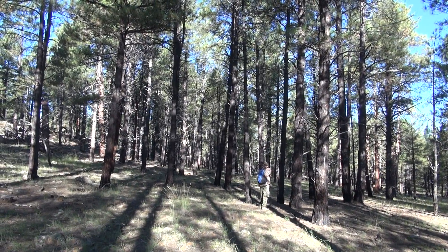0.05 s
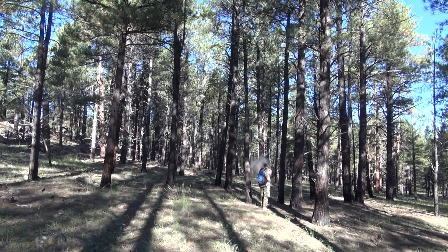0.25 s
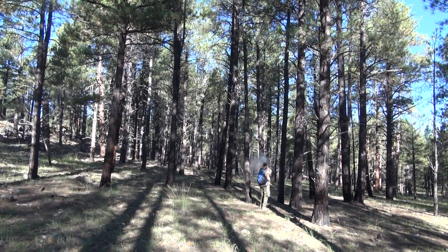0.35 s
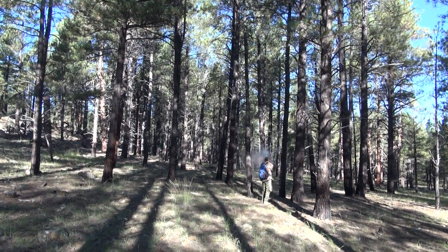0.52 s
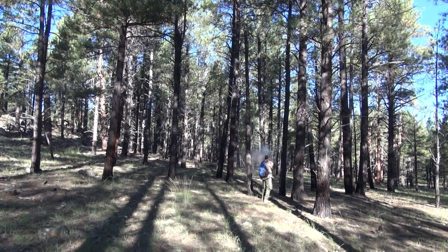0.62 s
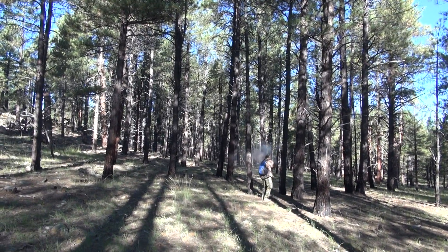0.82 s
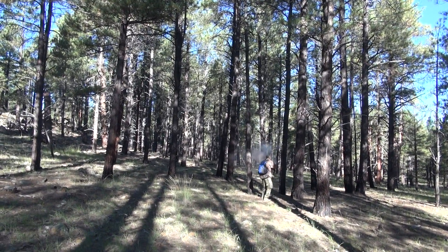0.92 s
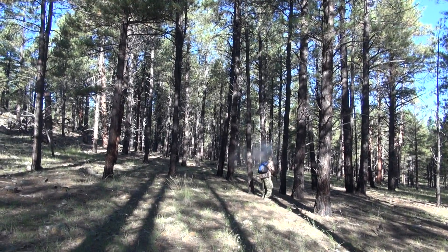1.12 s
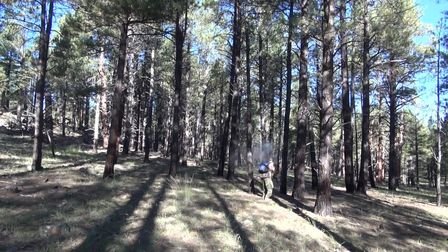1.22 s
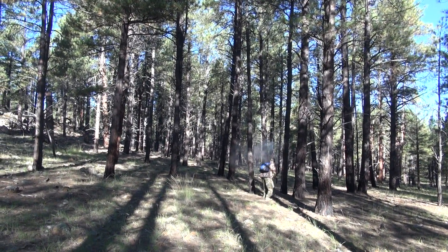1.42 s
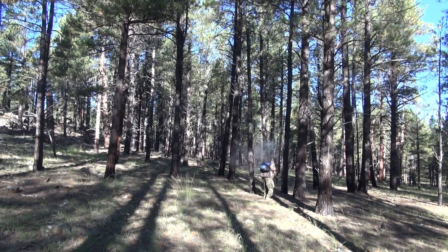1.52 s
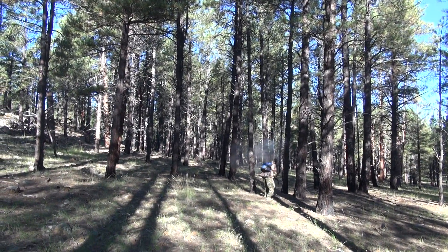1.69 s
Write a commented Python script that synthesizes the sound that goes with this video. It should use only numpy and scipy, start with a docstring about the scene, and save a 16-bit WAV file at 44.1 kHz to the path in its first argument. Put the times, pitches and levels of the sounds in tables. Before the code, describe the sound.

A single black-powder gunshot, heard from a distance outdoors among pines: a dull wide blast, dense crackling reverberation leaning right, low rolling booms, then a darker fading tail, squashed by the small stereo recorder's limiter.

```python
"""Rifle shot in a pine forest

A black-powder rifle is fired some thirty metres away: a dull, wide noise burst around an N-shaped pulse.
The trunks scatter it back as banded noise that loses its treble, with sharp single echoes (ring plus snap).
Low sine surges roll under it; a duller wash swells in behind, over quiet air, hiss and a faint throbbing tone.
The small recorder's limiter holds the roar flat; a slower gain control ducks and creeps back."""
import sys
import numpy as np
from scipy import signal
from scipy.io import wavfile
from scipy.ndimage import uniform_filter1d

SR = 44100
rng = np.random.default_rng(int(sys.argv[2]) if len(sys.argv) > 2 else 0)


def unload_audio(sound):
    """Save the sound as a 16-bit wav file, at the path given as the first command line argument."""
    columns = np.transpose(np.atleast_2d(sound))
    # keep every value between -1 and 1, then stretch to whole-number steps
    steps = np.round(np.clip(columns, -1, 1) * 32767)
    wavfile.write(sys.argv[1], SR, steps.astype(np.int16))


N = 77175
RUN_IN_SAMPLES = 8000  # lets the band filters settle

# Blast spectrum, relative: f/Hz, level/dB per Hz
BLAST_SPECTRUM = [(47, -53), (80, -38), (908, -4), (2080, -7.5), (2410, -10), (3350, -12), (5310, -34),
                  (6500, -60), (8450, -88.5), (14300, -120)]
# Near-trunk spectrum at roar onset, relative: f/Hz, level/dB per Hz
NEAR_SPECTRUM = [(20, -45.5), (30, -24), (90, -8.5), (196, -4), (314, -14), (443, -11), (659, -2.5),
                 (979, -11.5), (1300, -7), (2220, -11.5), (4500, -19), (9480, -28), (13400, -38),
                 (15000, -44), (16500, -48)]
# Near-trunk decay: f/Hz, loss/dB per s
NEAR_LOSS = [(40, 40), (150, 38), (350, 65.5), (1000, 28.5), (2500, 34), (5000, 45), (8000, 59.5),
             (11000, 78.5), (13000, 105), (15000, 150.5), (16500, 169.5)]
# Near-trunk balance: f/Hz, left minus right/dB
NEAR_PAN = [(60, 1), (200, -0.5), (380, -7), (700, -6), (1290, -2), (2380, -2), (4400, 0), (9000, 0),
            (12000, 0)]
# Far-slope spectrum at FAR_REFERENCE_S, relative: f/Hz, level/dB per Hz
FAR_SPECTRUM = [(18, -63), (30, -30.5), (78, -7.5), (108, -4), (138, -6), (204, -20), (377, -13), (596, 0),
                (1050, -3), (1150, 0), (1740, -11), (3080, -22), (7000, -44), (9100, -77), (15400, -120)]
# Far-slope decay: f/Hz, loss/dB per s
FAR_LOSS = [(40, 11.5), (300, 7), (1000, 16), (2000, 21), (3500, 30), (7000, 44)]
# Far-slope balance: f/Hz, left minus right/dB
FAR_PAN = [(60, -0.5), (110, -0.5), (200, 0), (380, -9), (700, -7.5), (1290, -5.5), (2380, -4.5),
           (4400, -2), (8120, 3), (15000, 9)]
# Left-right correlation of the roar: f/Hz, likeness/1
ROAR_LIKENESS = [(30, 0.61), (60, 0.99), (130, 1), (290, 0.98), (640, 0.99), (1400, .99), (3100, 1),
                 (4500, 0.98), (6100, 0.78), (7500, 0.82), (10500, .9), (12000, .999)]
# Echoes off single trunks: t/s, ring level/dB, ring f/Hz, snap level/dB
TRUNK_ECHOES = [(.2387, 0, 2700, -4), (.2433, 2, 2500, -12), (0.258, 10, 6000, 9), (.350, 10, 3000, 0),
                (.373, 0, 6000, -6), (0.4453, -2, 3000, -10), (0.6313, -24, 2000, -14),
                (0.6517, 1, 5730, -9.5), (0.6803, -6, 2290, -19), (0.7067, -10, 6000, -22),
                (.7245, -24, 5000, -24), (.7620, -4, 3200, -23), (.7658, 4, 3680, -7),
                (.8145, -19, 3470, -41), (1.12, -38, 6410, -51)]
# Low surges off ground and slopes: t/s of the peak, level/dB, f/Hz
ROLLS = [(.27, -10, 107), (0.302, -1, 197), (0.339, -3, 175), (0.399, -5.5, 164), (0.502, -7.5, 131),
         (0.602, -14.5, 146), (.69, -18.5, 140), (0.751, -16.5, 159), (0.888, -22.5, 113), (1.36, -33, 125)]
# Louder answers from far stands of trees: t/s, added level/dB
SWELLS = [(.75, 8.8), (0.861, 3.3), (.93, 2.9), (.985, 3.1)]
# Quiet air and hiss, relative: f/Hz, level/dB per Hz
AIR_SPECTRUM = [(30, -14.5), (72, -0.5), (160, -4), (290, 1), (400, -6), (650, -6), (900, -12),
                (1300, -11.5), (1940, -20), (2600, -15.5), (4400, -21), (6500, -20.5), (16500, -21.5)]
# Left-right correlation of the air: f/Hz, likeness/1
AIR_LIKENESS = [(60, 0.44), (240, 0.2), (950, 0.78), (3770, 0.71), (15000, 0.78)]

BLAST_START_S, BLAST_RISE_S, BLAST_HOLD_S, BLAST_DB = 0.2218, 0.002, 0.025, -14.5  # hold includes rise
BLAST_TOP_HZ, BLAST_LIKENESS = 5600, -0.25
PULSE_S, PULSE_LENGTH_S, PULSE_LEFT_DB, PULSE_RIGHT_DB = 0.2333, 0.00131, 3, -3
ROAR_S, NEAR_RISE_S, NEAR_DB = 0.240, 0.008, 1
SMALL_ECHOES_PER_S, SMALL_SPREAD_DB, SMALL_DB = 450, 4.5, -6  # SMALL_DB is relative to the white noise
ECHO_SNAP_S, ECHO_RING_CYCLES_PER_30_DB = 0.0008, 5.6
SNAP_LOW_HZ, SNAP_SLOPE_HZ = 1800, 5950
ECHO_TOP_HZ, ECHO_DULLING_HZ_PER_S, ECHO_RIGHT_LAG_S = 16000, 8200, 7e-6
ROLL_CYCLES = 6.0
FAR_DB, FAR_RISE_S, FAR_REFERENCE_S, SWELL_WIDTH_S = -19, 0.27, 1, 0.021
AIR_DB, THROB_HZ, THROB_WIDTH_HZ, THROB_DB = -70, 1073, 60, -77
LIMIT_DB, LIMIT_WINDOW_S, LIMIT_RELEASE_DB_PER_S = -20, 0.0084, 93
DUCK_FROM_DB, DUCK_MOST_DB, DUCK_RELEASE_DB_PER_S = -33.5, 12, 4
CUTOFF_HZ = 16750


def blast(t):
    """Muzzle blast: a short wide noise burst plus an N-wave of opposite sign in the channels, low-passed."""
    since_s = t - BLAST_START_S
    attack = np.clip(since_s / BLAST_RISE_S, 0, 1)
    release = np.clip((BLAST_HOLD_S - since_s) / BLAST_RISE_S + 1, 0, 1)
    burst = field(noise(), BLAST_SPECTRUM, [(1, BLAST_LIKENESS)]) * attack * release
    phase = (t - PULSE_S) / PULSE_LENGTH_S
    n_wave = (1 - 2 * phase) * (phase >= 0) * (phase < 1)
    front = n_wave * from_db([[PULSE_LEFT_DB], [PULSE_RIGHT_DB]]) * [[1], [-1]]
    return butter(from_db(BLAST_DB) * burst + front, BLAST_TOP_HZ, "low", order=8)


def near_trunks(t):
    """Dense scatter: noise plus random small impulses through decaying bands; the top treble dies fastest."""
    since_s = np.maximum(t - ROAR_S, 0)
    white = noise()
    size_db = SMALL_SPREAD_DB * np.minimum(rng.exponential(1, N), 4)
    sizes = from_db(size_db) * rng.choice([-1, 1], N)
    hits = rng.random(N) < SMALL_ECHOES_PER_S / SR
    white[:, 0, RUN_IN_SAMPLES:] += from_db(SMALL_DB) * rms_one(sizes * hits)
    rise = 1 - np.exp(-since_s / NEAR_RISE_S)
    roar = field(white, NEAR_SPECTRUM, ROAR_LIKENESS, NEAR_PAN, NEAR_LOSS, since_s, patchy_db=1.5)
    return from_db(NEAR_DB) * rise * roar


def single_trunks():
    """Sharp echoes: a decaying sine ring plus a filtered noise snap, duller with arrival time."""
    span_s = np.arange(800) / SR
    out = np.zeros(N + len(span_s))
    rough = rng.standard_normal((len(TRUNK_ECHOES), len(span_s)))
    shape = span_s / ECHO_SNAP_S * np.exp(1 - 2 * span_s / ECHO_SNAP_S)
    for (start_s, ring_db, hz, snap_db), grain in zip(TRUNK_ECHOES, rough):
        decay_db = 30 * span_s * hz / ECHO_RING_CYCLES_PER_30_DB
        ring = from_db(ring_db - decay_db) * np.sin(2 * np.pi * hz * span_s)
        snap = butter(grain * shape, SNAP_LOW_HZ, "high", order=2)
        snap = butter(snap, SNAP_SLOPE_HZ, "low", order=1)
        snap = from_db(snap_db) * snap / np.abs(snap).max()
        top_hz = min(ECHO_TOP_HZ - ECHO_DULLING_HZ_PER_S * start_s, 0.45 * SR)
        i = int(start_s * SR)
        out[i:i + len(span_s)] += butter(ring + snap, top_hz, "low", order=6)
    left = out[:N]
    right = np.interp(np.arange(N) - ECHO_RIGHT_LAG_S * SR, np.arange(N), left)
    return np.array([left, right])


def rolls(t):
    """Boom rolling back: low sines, each swelling and fading within ROLL_CYCLES, silent before the roar."""
    phases = rng.uniform(0, 2 * np.pi, (len(ROLLS), 1))
    peak_s, level_db, hz = np.transpose(ROLLS)[:, :, None]
    cycles = (t - peak_s) * hz
    shape = np.cos(np.pi * np.clip(cycles / ROLL_CYCLES, -0.5, 0.5)) ** 2
    surges = from_db(level_db) * shape * np.sin(2 * np.pi * cycles + phases)
    return np.sum(surges, axis=0) * (t > ROAR_S)


def far_slopes(t):
    """Far scatter: duller, slower-decaying noise that swells in, leans right in the mids and surges."""
    rise = 1 - np.exp(-np.maximum(t - ROAR_S, 0) / FAR_RISE_S)
    swell_db = sum(db * np.exp(-((t - s) / SWELL_WIDTH_S) ** 2) for s, db in SWELLS)
    since_s = t - FAR_REFERENCE_S
    wash = field(noise(), FAR_SPECTRUM, ROAR_LIKENESS, FAR_PAN, FAR_LOSS, since_s, patchy_db=1.0)
    return from_db(FAR_DB + swell_db) * rise * wash


def background():
    """Quiet air and hiss as banded noise, plus narrow-band noise heard as a faint throbbing tone."""
    band_hz = [THROB_HZ - THROB_WIDTH_HZ / 2, THROB_HZ + THROB_WIDTH_HZ / 2]
    tone = rms_one(butter(rng.standard_normal(N), band_hz, "band", order=2))
    throb = tone * from_db(THROB_DB + 4.0 * drift(25))
    return from_db(AIR_DB) * field(noise(), AIR_SPECTRUM, AIR_LIKENESS, patchy_db=2.0) + throb


def field(white, spectrum, likeness, pan=((1, 0),), loss=((1, 0),), since_s=0, patchy_db=0):
    """Stereo noise in narrow bands that flicker and decay; nominally unit power at since_s = 0."""
    out, power = 0, 0
    edges_hz = 25 * 2 ** np.r_[0:6.9:1 / 3, 7:9.5:1 / 7]
    low_end_hz, high_end_hz = spectrum[0][0], spectrum[-1][0]
    for k, (low, high) in enumerate(zip(edges_hz, edges_hz[1:])):
        hz = np.sqrt(low * high)
        if not (low_end_hz < hz and low < high_end_hz):
            continue
        # alternate noise pairs keep neighbouring bands unrelated
        mid, side = butter(white[k % 2], [low, high], "band", order=4)[:, RUN_IN_SAMPLES:]
        alike = np.clip(at_hz(likeness, hz), -1, 1)
        lean_db = at_hz(pan, hz) / 2
        level_db = at_hz(spectrum, hz)
        power += from_db(2 * level_db) * 2 * (high - low) / SR
        gain = from_db(level_db - at_hz(loss, hz) * since_s + patchy_db * drift(11.5))
        pair = np.sqrt((1 + alike) / 2) * mid + np.sqrt((1 - alike) / 2) * side * [[1], [-1]]
        out = out + gain * pair * from_db([[lean_db], [-lean_db]])
    return out / np.sqrt(power)


def noise():
    """Two unrelated pairs of white noise, with run-in."""
    return rng.standard_normal((2, 2, RUN_IN_SAMPLES + N))


def drift(rate_hz):
    """Slow unit-rms noise: a double pole at rate_hz, run at SR / 40 and interpolated."""
    r = np.exp(-2 * np.pi * rate_hz * 40 / SR)
    slow = signal.lfilter([1], [1, -2 * r, r * r], rng.standard_normal(N // 40 + 1002))[1000:]
    return np.interp(np.arange(N) / 40, np.arange(len(slow)), rms_one(slow))


def butter(x, hz, kind, order):
    """Butterworth filter."""
    return signal.sosfilt(signal.butter(order, hz, kind, fs=SR, output="sos"), x)


def at_hz(points, hz):
    """Table value at hz, linear in log frequency."""
    table_hz, values = np.array(points).T
    return np.interp(np.log(hz), np.log(table_hz), values)


def rms_one(x):
    """Scale to unit power."""
    return x / np.sqrt(np.mean(x ** 2) + 1e-20)


def from_db(db):
    """Amplitude gain of a level in dB."""
    return 10 ** (np.asarray(db) / 20)


def scene():
    """Shot, scatter, echoes, rolls and background, summed."""
    t = np.arange(N) / SR
    return blast(t) + near_trunks(t) + far_slopes(t) + rolls(t) + single_trunks() + background()


def held(cut_db, release_db_per_s):
    """Gain cut with instant attack and linear dB release."""
    ramp_db = release_db_per_s * np.arange(N) / SR
    return np.maximum.accumulate(cut_db + ramp_db) - ramp_db


def record(dry):
    """Recorder: slow-release ducking, fast-release limiting on the short-term level, then the top cut."""
    power = uniform_filter1d(np.mean(dry ** 2, axis=0), int(LIMIT_WINDOW_S * SR))
    level_db = 10 * np.log10(power + 1e-12)
    duck_db = held(np.clip(level_db - DUCK_FROM_DB, 0, DUCK_MOST_DB), DUCK_RELEASE_DB_PER_S)
    limit_db = held(np.maximum(level_db - duck_db - LIMIT_DB, 0), LIMIT_RELEASE_DB_PER_S)
    top_cut = signal.cheby2(18, 60, CUTOFF_HZ, fs=SR, output="sos")
    return signal.sosfilt(top_cut, dry * from_db(-duck_db - limit_db))


dry = scene()
out = record(dry)
unload_audio(out)
```